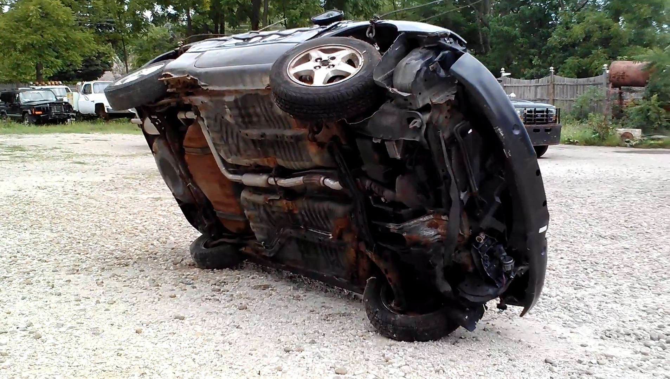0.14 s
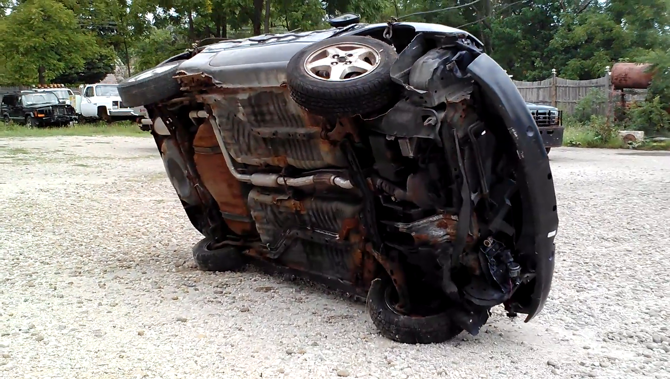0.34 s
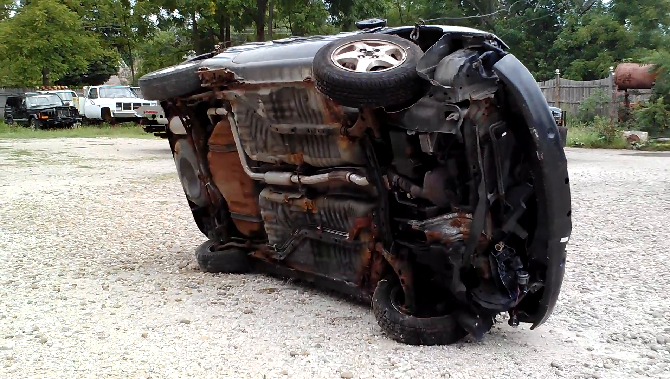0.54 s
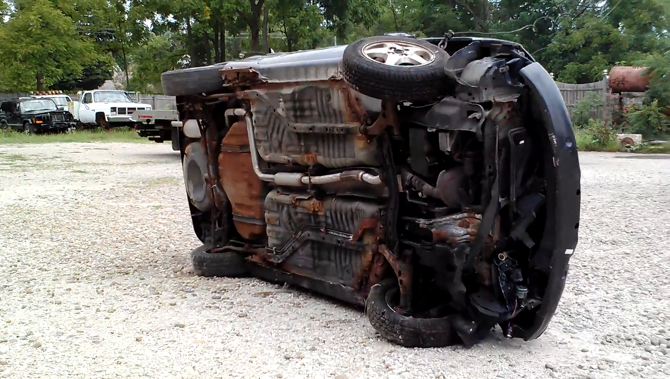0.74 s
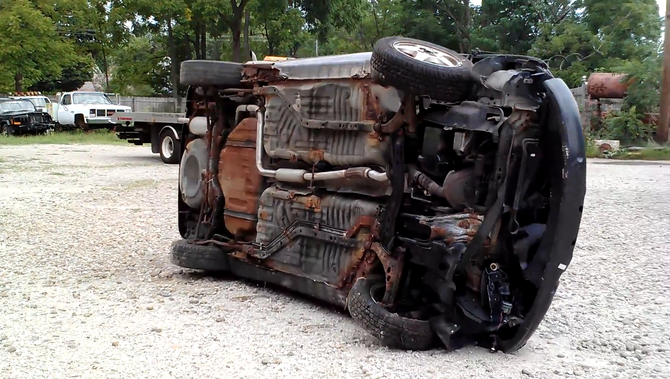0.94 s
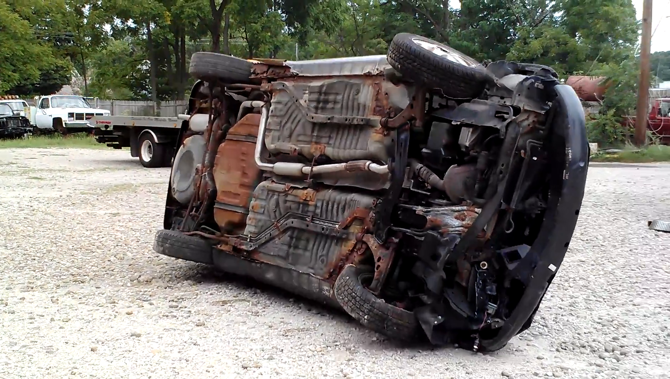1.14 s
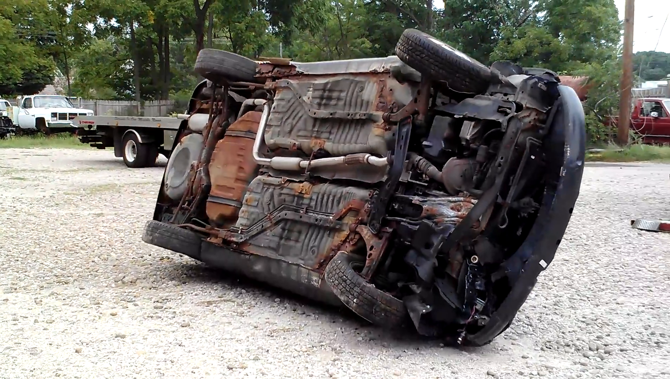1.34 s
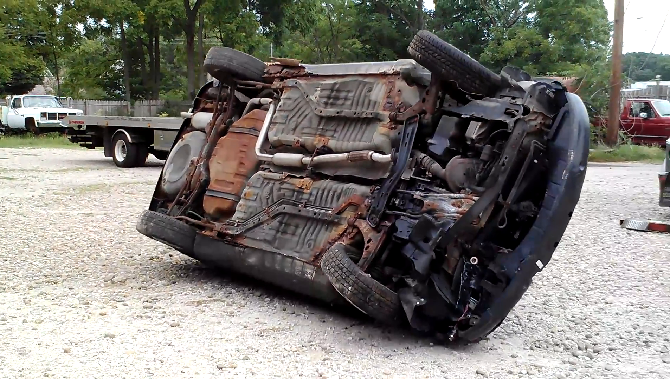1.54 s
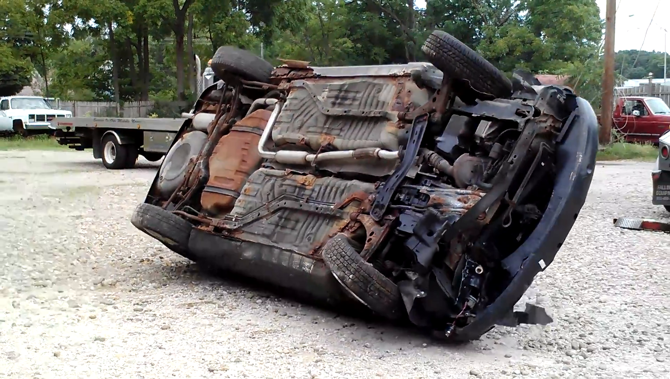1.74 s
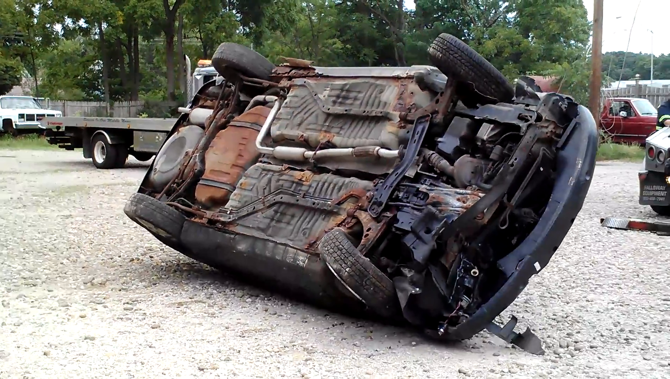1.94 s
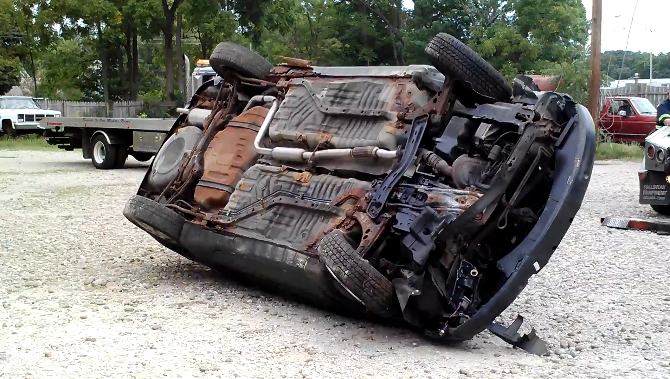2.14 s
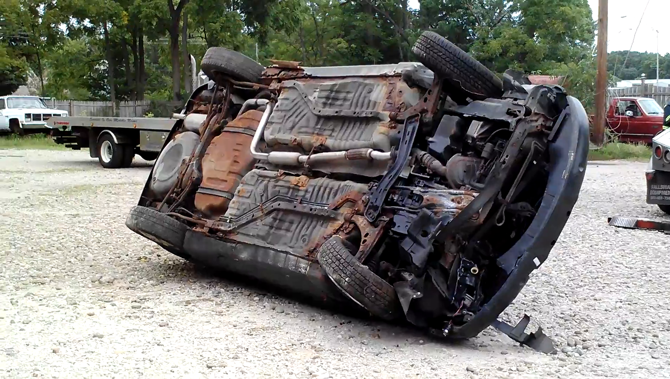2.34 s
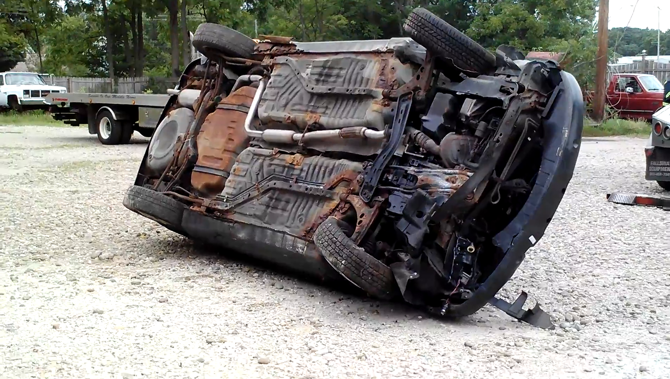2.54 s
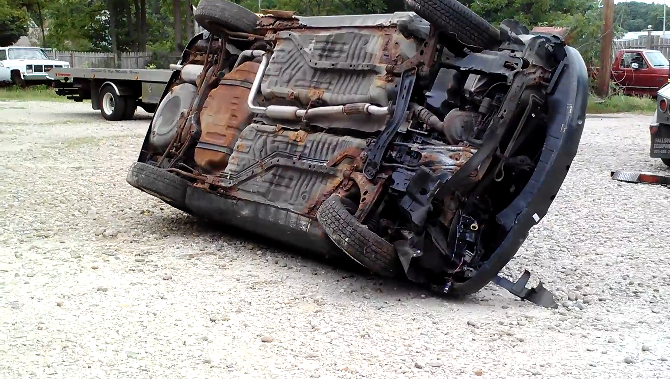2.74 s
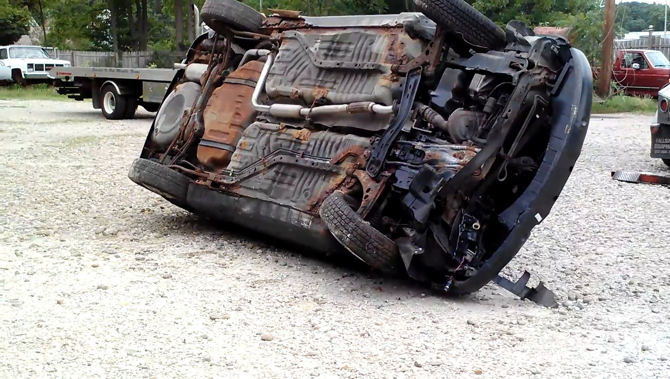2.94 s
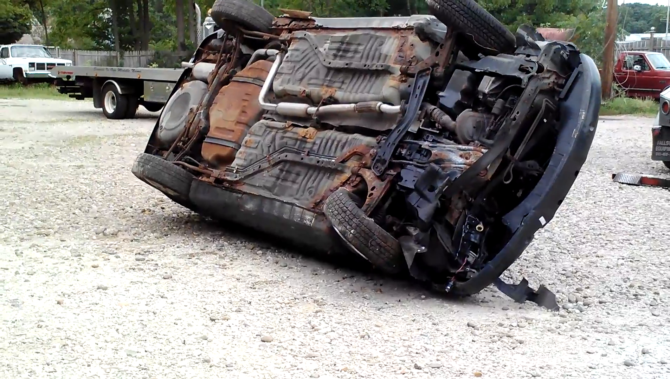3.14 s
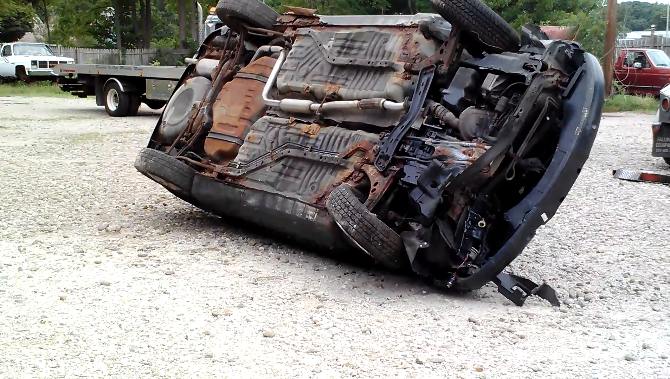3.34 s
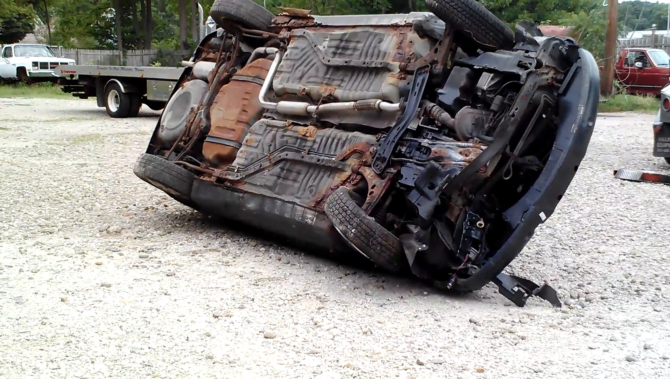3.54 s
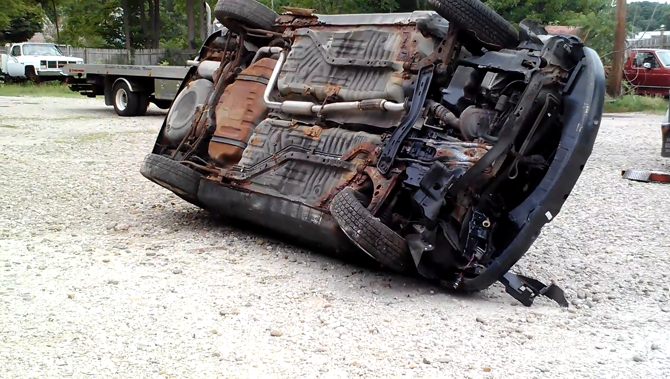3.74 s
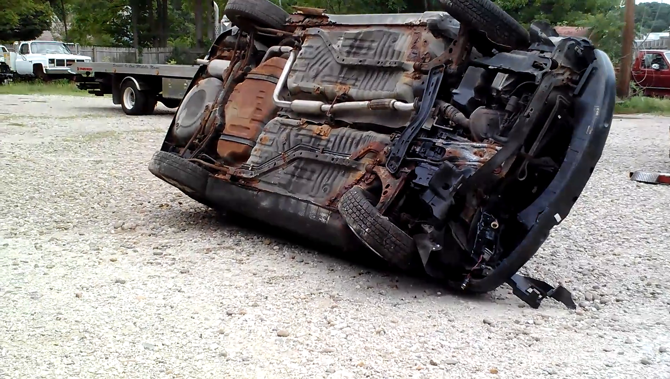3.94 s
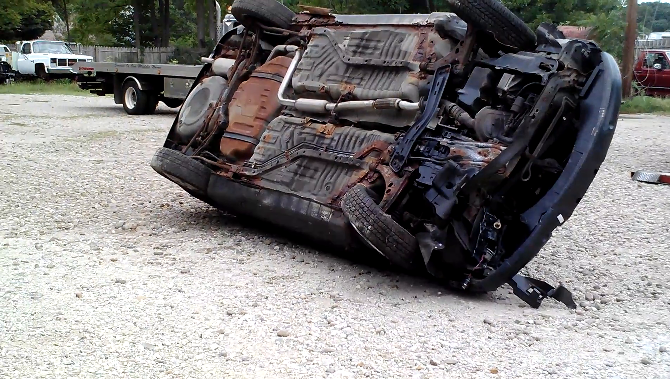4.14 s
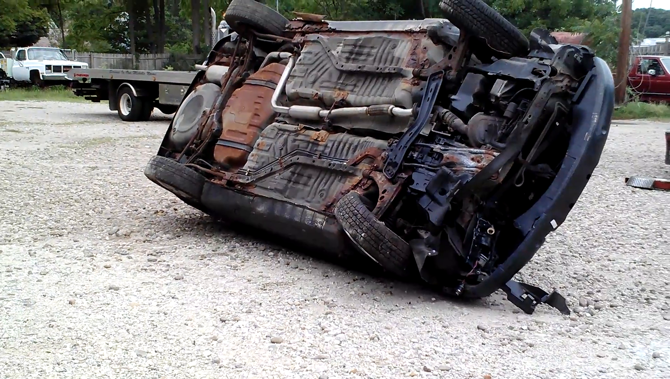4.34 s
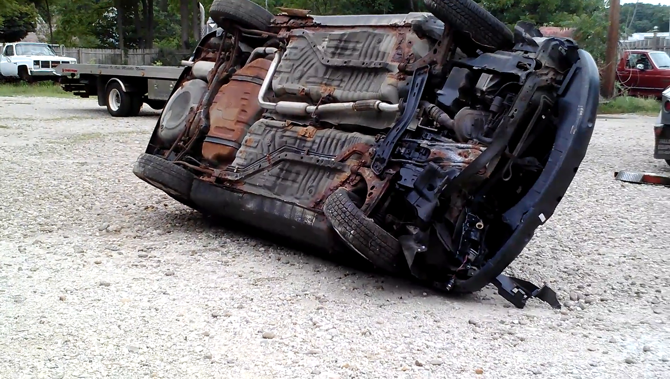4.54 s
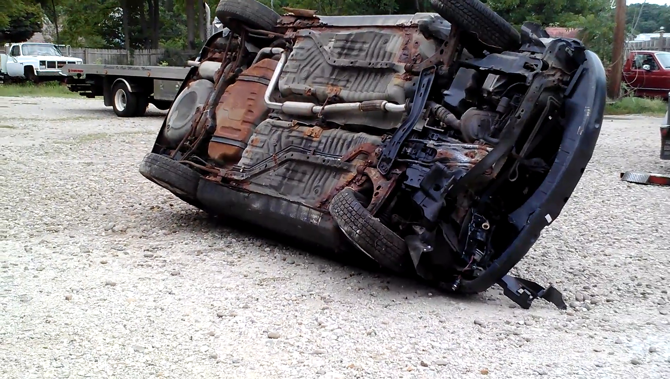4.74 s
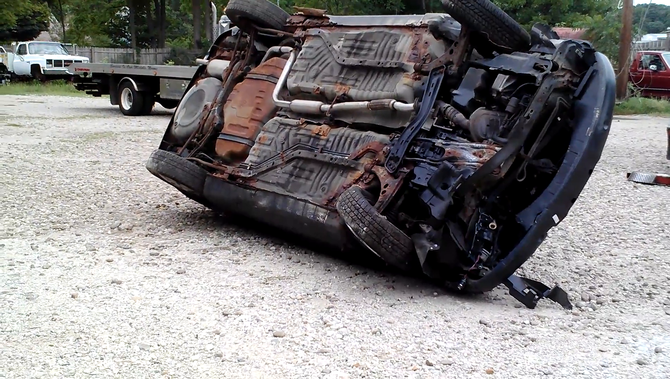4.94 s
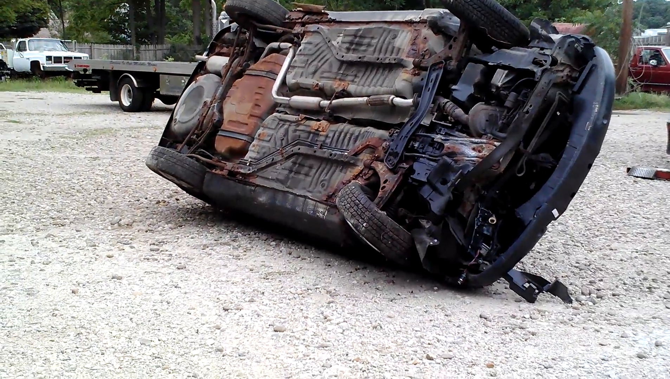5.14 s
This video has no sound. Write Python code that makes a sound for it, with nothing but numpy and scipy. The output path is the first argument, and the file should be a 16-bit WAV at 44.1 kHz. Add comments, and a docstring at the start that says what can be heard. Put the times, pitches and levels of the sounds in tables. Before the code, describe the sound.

Over a low idling engine, sheet metal snaps and buckles in a loud gravelly crash, followed by a steel clank and sparse settling knocks.

```python
"""Wrecked car rolled onto its roof

A wrecked car is pulled from its side over onto its roof in a gravel yard, with a tow truck running nearby.
The body snaps, buckles, thuds and grinds: random pushes and tiny slips shake ringing modes of the metal.
Slides groan or squeal as sagging tones, a loose steel part clanks, and the shell knocks as it settles.
Stones are showers of tiny random clicks; engine and hydraulics are filtered noise throbbing together over a hum."""
import sys
import numpy as np
from scipy import signal
from scipy.fft import rfft, irfft
from scipy.io import wavfile

SR = 44100
rng = np.random.default_rng(int(sys.argv[2]) if len(sys.argv) > 2 else 0)


def pcm_store(signal):
    """Save signal as 16-bit PCM."""
    levels = np.round(np.clip(np.atleast_2d(signal), -1, 1) * 32767)
    wavfile.write(sys.argv[1], SR, levels.astype(np.int16).T)


N = 228855
TIME = np.arange(N) / SR  # seconds from the start of the scene
AGE = TIME[:SR // 3]  # seconds from the start of one short event


def undb(db):
    """Turn decibels into a gain."""
    return 10 ** (np.asarray(db) / 20)


def unit(x):
    """Scale to an average (rms) level of 1."""
    return x / np.sqrt(np.mean(x ** 2) + 1e-18)


def unit_hit(x):
    """Scale a hit to rms 1 over its first 25 ms."""
    return x / np.sqrt(np.mean(x[:SR // 40] ** 2) + 1e-18)


def add(out, s, x):
    """Mix x into out from time s, cutting off whatever runs past the end."""
    i = max(int(s * SR), 0)
    out[i:i + len(x)] += x[:max(len(out) - i, 0)]


def through(x, response):
    """Let x excite an object with this response, keeping the length of x."""
    return signal.fftconvolve(x, response)[:len(x)]


def tone(points, size=4096):
    """Response of unit energy with a (Hz, dB) spectrum that acts as early as possible (minimum phase)."""
    hz, db = np.transpose(points)
    grid = np.maximum(np.arange(size // 2 + 1) * SR / size, 1)
    log_gain = np.log(undb(np.interp(np.log(grid), np.log(hz), db)))
    # folding the cepstrum forward in time leaves nothing before the hit
    cepstrum = irfft(log_gain)
    cepstrum[1:size // 2] *= 2
    cepstrum[size // 2 + 1:] = 0
    response = irfft(np.exp(rfft(cepstrum)))
    return response / np.linalg.norm(response)


# Three pitch ranges for boom, clang and crack. Each row: lowest and highest frequency in Hz.
REGISTER_EDGES = [(48, 450), (450, 1600), (1600, 12000)]


def registers(x):
    """Split a sound into boom, clang and crack with band filters."""
    parts = []
    for edges in REGISTER_EDGES:
        band = signal.butter(3, edges, "band", fs=SR, output="sos")
        parts.append(signal.sosfilt(band, x))
    return parts


def wander(rate, size):
    """Random motion: straight lines between random points, rate points a second, with a spread near 1."""
    knots = rng.standard_normal(4096)
    return np.interp(TIME[:size] * rate, np.arange(len(knots)), knots)


def slips(rate, spread_db, size):
    """Tiny slips at random moments, about rate a second, of uneven force and either direction."""
    when = rng.random(size) < rate / SR
    force = undb(spread_db * np.minimum(rng.exponential(size=size), 4))
    return unit(when * force * rng.choice([-1, 1], size))


def blow(slip_s, slip_db, rate=3000):
    """One sharp push, plus a dying shower of slips whose energy is set relative to the push."""
    push = slips(rate, 2.65, len(AGE)) * np.exp(-AGE / max(slip_s, .001))
    push *= undb(slip_db) / (np.linalg.norm(push) + 1e-9)
    push[0] += 1
    return push


def ring(modes, scatter_db, detune):
    """Fading tones of unit energy; each strike point weights and detunes them a little differently."""
    hz, db, t60 = np.transpose(modes)[:, :, None]
    weight, shift = rng.standard_normal((2, len(modes), 1))
    fade = undb(db + scatter_db * weight - 60 * AGE / t60)
    response = np.sum(fade * np.sin(2 * np.pi * hz * (1 + detune * shift) * AGE), axis=0)
    return response / np.linalg.norm(response)


def own_mode(hz, t60):
    """A single fading tone of unit energy, t60 being the seconds it takes to fall by 60 dB."""
    return ring([(hz, 0, t60)], scatter_db=0, detune=0)


# Notes at which the body shell rings.
# Each row: pitch in Hz, relative level in dB, time to fade by 60 dB in seconds; pitch and level then vary.
SHELL_MODES = [(88, -37.5, .12), (116, -4.5, 0.5), (161, -5.5, 0.25), (207, -12, 0.06), (247, -21, .1),
               (278, 2.5, 0.45), (311.5, 2.5, 0.34), (333, -4.5, 0.17), (402.7, 4, 0.15), (487, -0.5, 0.33),
               (608.5, 1.5, 0.15), (686.4, 2, 0.21), (764, -4.5, 0.5), (850, 5, 0.096), (1077, 0, 0.14),
               (1165, -2.5, 0.18), (1270, -4, 0.32), (2084, -3, 0.13), (2420, 2, 0.16),
               (2780, -20.5, 0.039), (4200, -7, 0.024), (4360, -29, .06), (4700, -28, 0.074)]
# Colour of the dull crash made by the shell's many short notes. Each row: frequency in Hz, relative level in dB.
SHEET_COLOUR = [(45, -17), (100, -0.5), (290, 5.5), (550, 0.5), (760, 2), (1000, -8), (1300, -8),
                (1650, -23.5), (2450, -7), (3600, -23), (4600, -13), (6400, -25), (8000, -42),
                (10000, -54.5)]


def shell(sheet, ring_db, spread_db=2, spread_s=0.0035):
    """Response of the car body at one point: a dull crash and the ring of its panels."""
    # bending waves bounce between the seams and spread each click over a few milliseconds
    bounces = rng.standard_normal(len(AGE)) * np.exp(-AGE / spread_s)
    bounces *= undb(spread_db) / np.linalg.norm(bounces)
    bounces[0] += 1
    crash = through(bounces, sheet)
    crash = crash / np.linalg.norm(crash)
    return crash + undb(ring_db) * ring(SHELL_MODES, scatter_db=8, detune=0.03)


HUM_HZ, HUM_DB = 46.5, -46  # both waver a little


def hum():
    """A deep idle hum lies under the yard: one sine whose pitch and level waver slightly."""
    phase = 2 * np.pi * np.cumsum(HUM_HZ * (1 + 0.0047 * wander(7.5, N))) / SR
    return undb(HUM_DB + 1.9 * wander(23.0, N)) * np.sqrt(2) * np.sin(phase)


# Steady engine tones. Each row: multiple of the firing rate, average level in dB relative to the rumble.
ENGINE_ORDERS = [(2, -11.5), (3, -13), (7, -25)]
# Colours of the engine rumble, the pump hiss and the valve hiss.
# Each row: frequency in Hz, relative level in dB.
RUMBLE_COLOUR = [(35, -47), (55, -13.5), (75, -3), (100, 4), (170, 1.5), (320, 2.5), (500, -4),
                 (1100, -9.5), (1600, -18), (2200, -16.5), (3400, -24), (6000, -21.5), (7400, -27),
                 (9000, -56)]
PUMP_COLOUR = [(1500, -21), (2200, -22.5), (2560, -9), (2850, -20.5), (3400, -32), (9000, -41.5)]
VALVE_COLOUR = [(3000, -46.5), (3700, -11), (3920, 4), (4250, 4), (5000, -16.5), (6000, -8), (9000, -26)]
# the engine labours when the valve opens, then picks up again
IDLE_HZ, LABOUR_DROP_HZ = 44.8, 6  # firing rate and how far it sinks
VALVE_OPENS_S, VALVE_RISE_S, RECOVER_S = 3.36, 0.084, 1.6
RUMBLE_DB, PUMP_DB, VALVE_DB = -32.5, -44.5, -48  # base levels
VALVE_OPEN_DB = 4.5  # extra valve hiss at full opening
HISS_GROWS_DB, HISS_GROWS_S = 0.5, 3.2  # the hiss starts this many dB softer and grows to full level over these seconds
PULL_RUMBLE_DB, PULL_RISE_S = 0.8, 0.5  # the engine runs a little louder while it hauls the car over
LABOUR_DB = -0.5  # and softer while it is slowed


def truck(throb=0.048, ripple=0.29, rumble_drift_db=0.38, hiss_drift_db=1.67):
    """The engine rumbles once per firing; the hydraulic pump and valve hiss in the same rhythm."""
    effort = np.interp(TIME - VALVE_OPENS_S, [0, VALVE_RISE_S, VALVE_RISE_S + RECOVER_S], [0, 1, 0])
    hz = IDLE_HZ - LABOUR_DROP_HZ * effort ** 2
    phase = 2 * np.pi * np.cumsum(hz * (1 + 0.014 * wander(20, N))) / SR

    bursts = rng.standard_normal(N) * (1 + throb * np.cos(phase))
    rumble = unit(through(bursts, tone(RUMBLE_COLOUR)))
    orders = 0
    for multiple, db in ENGINE_ORDERS:
        orders = orders + undb(db + 2 * wander(8.7, N)) * np.sqrt(2) * np.sin(round(multiple) * phase)
    # the extra loudness stops at once when the valve is fully open
    hauling_db = np.interp(TIME, [0, PULL_RISE_S], [0, PULL_RUMBLE_DB])
    hauling_db = np.where(TIME > VALVE_OPENS_S + VALVE_RISE_S, 0, hauling_db)
    engine_db = RUMBLE_DB + hauling_db + LABOUR_DB * effort + rumble_drift_db * wander(5.17, N)
    out = undb(engine_db) * (rumble + orders)

    working_db = np.interp(TIME, [0, HISS_GROWS_S], [-HISS_GROWS_DB, 0])
    valve_db = VALVE_DB + VALVE_OPEN_DB * np.sqrt(effort)
    for colour, db in (PUMP_COLOUR, PUMP_DB), (VALVE_COLOUR, valve_db):
        flow = rng.standard_normal(N) * (1 + ripple * np.cos(phase))
        hiss = unit(through(flow, tone(colour)))
        out += undb(db + working_db + hiss_drift_db * wander(30, N)) * hiss
    return out


# Colour of moving stones, for the trickle and the crushed stones.
# Each row: frequency in Hz, relative level in dB.
STONE_COLOUR = [(200, 4.5), (1000, 2), (1600, -9.5), (2500, -1), (3600, -9), (4600, 0), (6500, -9),
                (8000, -29), (10000, -31.5)]
# gravel keeps shifting under the roof, slightly less often as time goes on; pockets past the end go unheard
TRICKLE_FROM_S, TRICKLE_UNTIL_S = 1.8, 7.5
TRICKLE_DB, TRICKLE_FADE_S = -38, 0.0068  # average level before fading, fade time of one pocket


def trickle(scatter_db=2, count=14):
    """Small pockets of stones give way at random, each a quickly dying shower of clicks."""
    out, colour = np.zeros(N), tone(STONE_COLOUR)
    for _ in range(count):
        s = TRICKLE_FROM_S + (TRICKLE_UNTIL_S - TRICKLE_FROM_S) * rng.random() ** 1.2
        grains = slips(rate=2400, spread_db=3.0, size=len(AGE)) * np.exp(-AGE / TRICKLE_FADE_S)
        level = undb(TRICKLE_DB + scatter_db * rng.standard_normal())
        add(out, s, level * through(grains, colour))
    return out


# Stones crushed and pushed aside. Each row: start in seconds, length in seconds, level in dB before the swell.
STONE_SHOWERS = [(0.753, 0.059, -27.5), (0.931, 0.042, -24), (0.993, 0.038, -26), (1.117, 0.068, -24),
                 (1.273, 0.056, -28), (1.319, 0.053, -19.5), (1.507, 0.064, -23), (1.578, 0.025, -16),
                 (1.663, 0.061, -25), (1.729, 0.031, -14), (1.747, 0.038, -10.5), (1.79, 0.0094, -12.5),
                 (1.807, 0.017, -15.5), (1.933, 0.024, -23), (2.225, 0.028, -23), (2.293, 0.032, -23),
                 (2.444, 0.056, -31), (2.528, 0.016, -30), (3.059, 0.031, -21), (3.075, 0.049, -26),
                 (3.297, 0.042, -37.5), (3.544, 0.022, -32), (3.634, 0.025, -35.5)]


def stones(clump_db=1):
    """Short showers of gravel grains that swell fast and thin out in clumps."""
    out, colour = np.zeros(N), tone(STONE_COLOUR)
    for s, length, db in STONE_SHOWERS:
        swell = np.sin(np.pi * np.minimum(AGE / length, 1) ** 0.61)
        clumps = undb(clump_db * wander(247, len(AGE)))
        grains = slips(rate=6000, spread_db=-1.1, size=len(AGE))
        add(out, s, undb(db) * through(swell * clumps * grains, colour))
    return out


# Knocks of the wreck settling on its roof. Each row: start in seconds, level in dB,
# tilt towards the treble in dB per octave, time the gravel takes to yield in seconds.
SETTLING_KNOCKS = [(2.881, -27.5, -0.8, 0.0066), (2.929, -25, 2, 0.0015), (3.119, -22, -5.5, 0.0062),
                   (3.4808, -18.5, 1.5, 0.0011), (3.592, -31.5, -3.5, 0.0029), (4.4513, -19, -1.34, 0.0022),
                   (4.706, -31.5, 1, 0.0048), (4.753, -37, 0.5, 0.004)]
# Colour of a knock before the tilt. Each row: frequency in Hz, relative level in dB.
KNOCK_COLOUR = [(80, -20), (230, 2.5), (300, 5), (420, -8), (530, -13), (660, -2), (850, -3.5),
                (980, -10.5), (1170, -4), (1400, -10.5), (1800, -18), (2400, -13), (3000, -16.5),
                (3650, -27), (4250, -13), (5200, -21), (6700, -26), (9000, -49)]


def knocks(rebound_s=0.0105, rebound_db=-5, scatter_s=0.029, scatter_db=2, ring_db=-12):
    """The resting shell drops a little onto gravel: a dry knock, one rebound and a scatter of small contacts."""
    out = np.zeros(N)
    for s, db, tilt, yield_s in SETTLING_KNOCKS:
        tilted = [(hz, level + tilt * np.log2(hz)) for hz, level in KNOCK_COLOUR]
        colour = tone(tilted, size=len(AGE))
        push = blow(slip_s=0.0057, slip_db=10, rate=9000) + blow(scatter_s, scatter_db, rate=6500)
        add(push, rebound_s, undb(rebound_db) * blow(slip_s=0.0069, slip_db=8, rate=9000))
        push *= np.minimum(AGE / yield_s, 1)  # soft gravel rounds the start
        body = colour + undb(ring_db) * ring(SHELL_MODES, scatter_db=5.0, detune=0.033)
        add(out, s, undb(db) * unit_hit(through(push, body)))
    return out


# Metal sliding on metal, from low groans to squeals. Each row: start in seconds, length in seconds,
# starting pitch in Hz, average level in dB, share of the pitch lost as the slide slows.
SLIDES = [(0.264, 0.11, 2780, -39, 0.026), (0.802, 0.0456, 315, -10, 0.14),
          (0.819, 0.028, 2246, -22.5, 0.097), (0.828, 0.039, 3470, -26, 0.03),
          (0.837, 0.025, 2995, -16, 0.085), (0.836, 0.041, 4800, -30, 0.03),
          (0.851, 0.035, 2740, -21.5, 0.041), (1.251, 0.033, 501, -13.5, 0.046),
          (1.399, 0.027, 418, -12, 0.07), (1.411, 0.046, 259, -13.5, 0.052),
          (1.491, 0.018, 290, -11, 0.045), (2.174, 0.055, 3360, -42, 0.04),
          (2.253, 0.038, 2680, -33.5, 0.07), (2.38, 0.022, 2340, -40, 0.04),
          (2.406, 0.028, 2190, -39, 0.04)]


def squeals(flutter_db=4, light_rough=0.014, heavy_rough=0.128):
    """Sliding edges groan or sing briefly on a sagging note; louder slides have a rougher pitch, like a scrape."""
    out = np.zeros(N)
    for s, length, first_hz, db, sag in SLIDES:
        travel = np.minimum(AGE / length, 1)
        rough = np.interp(db, [-35, -22], [light_rough, heavy_rough])
        hz = first_hz * (1 - sag * travel) * (1 + rough * wander(913, len(AGE)))
        swell = np.sqrt(2 * np.abs(np.sin(np.pi * travel)))
        grip = swell * undb(db + flutter_db * wander(489, len(AGE)))
        add(out, s, grip * np.sin(2 * np.pi * np.cumsum(hz) / SR))
    return out


# Notes of the loose steel part.
# Each row: pitch in Hz, relative level in dB, time to fade by 60 dB in seconds; pitch and level vary slightly.
CLANK_MODES = [(634, -6, 0.25), (730, 0, .12), (757, 1.5, 0.11), (834, 5.5, 0.098), (1115, -6.5, 0.15),
               (1272, -6, 0.17), (2190, -26, 0.08), (2337, -8, 0.058), (2540, -23, .08), (2730, -20, 0.12),
               (3900, -26, 0.1), (4270, -40, .1)]
# Colour of its rattle. Each row: frequency in Hz, relative level in dB.
RATTLE_COLOUR = [(150, -23), (500, -4.5), (780, 2), (1250, -5.5), (1650, -14.5), (2400, -8.5), (3500, -21),
                 (4600, -16.5), (6500, -32), (9000, -57)]
CLANK_S, CLANK_DB = 2.3378, -7.5  # start, level


def clank(bounce_db=-9, rattle_db=-4.5, bounce_s=0.015, rattle_s=0.062, stop_s=0.055, contact_s=0.0013):
    """A loose steel part strikes hard, then bounces and rattles against the shell until it lies still."""
    out, part = np.zeros(N), ring(CLANK_MODES, scatter_db=-1.0, detune=0.0014)
    bounces = through(blow(bounce_s, slip_db=20, rate=240), part)
    taps = blow(rattle_s, slip_db=22, rate=2200) * np.exp(-(AGE / stop_s) ** 4)
    rattle = through(taps, tone(RATTLE_COLOUR))
    hit = unit_hit(part) + undb(bounce_db) * unit_hit(bounces) + undb(rattle_db) * unit_hit(rattle)
    # the yielding panel rounds the first contact
    add(out, CLANK_S, undb(CLANK_DB) * unit_hit(hit * np.minimum(AGE / contact_s, 1)))
    return out


# Wide panels taking the weight. Each row: start in seconds, pitch in Hz before the sag, level in dB,
# level of the heave of the whole shell in dB, time to swell in seconds.
PANEL_THUDS = [(0.198, 200, -23, -19.5, 0.0049), (0.258, 172, -30, -35, .006), (0.659, 269, -26, -21, .006),
               (0.793, 300, -13, -30, .005), (0.866, 254, -9.5, -13.5, .005), (0.889, 258, -13, -32, .006),
               (0.992, 290, -24, -15.5, .005), (1.034, 380, -17.5, -22.5, .005),
               (1.054, 254, -14, -26, .005), (1.089, 350, -16.5, -32, .005), (1.14, 302, -15, -16.5, .007),
               (1.199, 285, -14.5, -21, .006), (1.273, 320, -15, -32, .005), (1.293, 339, -14, -22, .005),
               (1.32, 302, -15, -23, .006), (1.369, 285, -11.5, -32, .006), (1.385, 330, -20, -15, .005),
               (1.452, 370, -18, -13.5, .006), (1.571, 290, -18, -31, .005), (1.608, 300, -26, -27, .005),
               (1.661, 240, -20, -23, .004), (1.699, 302, -20, -21, .005), (1.744, 260, -24, -20, .005),
               (1.908, 302, -25, -27, .005), (1.947, 360, -20, -41, .006), (2.2, 230, -24.5, -38, .005),
               (2.273, 269, -22, -31, .006)]
HEAVE_HZ = 142  # the whole shell's note, before scatter and sag
THUD_SAG = .06  # pitch slides from this share above the note to the same share below


def thuds(release=.8, rough=.04, heave_scatter=.05):
    """A wide panel gives way with one short, sagging note, and the whole shell heaves under it."""
    out = np.zeros(N)
    for s, hz, db, heave_db, swell_s in PANEL_THUDS:
        age = AGE / swell_s
        swell = (age * np.exp(1 - age)) ** release
        sag = THUD_SAG * (2 * np.exp(-age / 2) - 1)
        turn = 2 * np.pi * np.cumsum(1 + sag + rough * wander(400, len(AGE))) / SR
        heave_hz = HEAVE_HZ * (1 + heave_scatter * rng.standard_normal())
        panel = undb(db) * np.sin(hz * turn)
        heave = undb(heave_db) * np.sin(heave_hz * turn)
        add(out, s, np.sqrt(2) * swell * (panel + heave))
    return out


# The weight bears on the roof and pushes it along the ground. Each row: start in seconds, end in seconds,
# load in dB, extra level of the grit under the roof in dB, release in dB per second.
ROOF_SHOVES = [(0.139, 0.205, -16, 2, 93), (0.41, 0.723, -17, -3, 68), (0.739, 0.867, 5.5, -1.5, 71),
               (0.95, 1.167, 2.5, -3.5, 31), (1.261, 1.382, 5, -2.5, 74), (1.434, 1.54, 2, 1.5, 41),
               (1.637, 1.813, 1, 4.5, 56), (2.206, 2.35, -5, 0.5, 89)]
LOAD_RISE_S = 0.0092


def roof_load():
    """Each shove builds quickly, holds, and dies away; returns the load and the part of it that crushes grit."""
    loads, grits = [], []
    for start, end, db, grit_db, release in ROOF_SHOVES:
        build = np.clip((TIME - start) / LOAD_RISE_S, 0, 1)
        load = build * undb(db - release * np.maximum(TIME - end, 0))
        loads.append(load)
        grits.append(load * undb(grit_db))
    return np.max(loads, axis=0), np.max(grits, axis=0)


# Colour of gravel grinding under the roof. Each row: frequency in Hz, relative level in dB.
GRIT_COLOUR = [(700, -23), (1400, -5.5), (1900, 4), (2500, -2), (3100, 3), (3700, -6), (4500, -2),
               (6400, -8.5), (8000, -35), (10000, -37)]
JERKS_PER_S, JERK_SPREAD_DB = 110, 2.5  # the roof sticks and slips along the ground


def grinding(boom_db=-22, clang_db=-21.5, crackle_db=-34, gravel_db=-35, jerk_db=1.0, shift_db=3,
             gravel_jerk_db=4, count=6):
    """Contact points stick and slip in jerks, each shaking the shell in its own way; the gravel under them roars."""
    sheet, crunch, total = tone(SHEET_COLOUR), 0, 0
    for _ in range(count):
        load = undb(shift_db * wander(8.65, N))
        jerks = slips(JERKS_PER_S, JERK_SPREAD_DB, size=N) * undb(jerk_db * wander(70, N))
        crunch = crunch + through(load * jerks, shell(sheet, ring_db=-4))
        total = total + load ** 2
    # together the contact points always carry the same weight
    boom, clang, crackle = map(unit, registers(crunch / np.sqrt(total)))
    grains = slips(rate=2500, spread_db=1.5, size=N) * undb(gravel_jerk_db * wander(90, N))
    gravel = unit(through(grains, tone(GRIT_COLOUR)))
    weight, grit = roof_load()
    metal = weight * (undb(boom_db) * boom + undb(clang_db) * clang)
    return metal + grit * (undb(crackle_db) * crackle + undb(gravel_db) * gravel)


# Sheet metal buckling. Each row: start in seconds, strength in dB before the boom, clang and crack settings,
# pitch of the dent in Hz, extra strength of the crack in dB, time the fold keeps slipping in seconds.
PANEL_BUCKLES = [(0.155, -30, 633, -19, 0.034), (0.333, -25, 826, -13, 0.012),
                 (0.719, -14, 780, -38, 0.0085), (0.733, -7.5, 762, -13.5, 0.0083),
                 (0.749, -13.5, 770, -26, .016), (0.794, -7.5, 734, -15, .014),
                 (0.817, -10.5, 647, -12.5, 0.025), (0.846, -17, 800, -10, 0.0058),
                 (0.896, -16.5, 1040, -11, 0.0074), (0.913, -12.5, 815, -19, 0.0087),
                 (0.973, -18, 688, -5, 0.0073), (1.032, -6, 740, -16.5, 0.012),
                 (1.089, -24, 424, -19, 0.0055), (1.139, -14, 423, -3, 0.02),
                 (1.1945, -9.5, 720, -19, 0.0029), (1.297, -19, 595, -11, 0.02),
                 (1.321, -13, 790, -8, 0.016), (1.385, -6, 640, -16, 0.0088),
                 (1.448, -18.5, 730, -8, 0.0062), (1.505, -12, 425, -14.5, 0.0057),
                 (1.511, -12, 756, -4, 0.023), (1.608, -8.5, 510, -19, 0.0056),
                 (1.611, -12.5, 760, -10, 0.013), (1.634, -11.5, 940, -6.5, 0.0024),
                 (1.665, -13, 693, -3.5, 0.026), (1.701, -12, 525, -7, 0.0057),
                 (1.744, -13, 700, 1, 0.0072), (1.7481, -16, 1340, 1, 0.01), (1.778, -16, 820, -0.5, .006),
                 (1.793, -13, 870, -4, .007), (1.812, -8.5, 757, -14, 0.0054),
                 (1.824, -11.5, 615, -19, 0.0082), (1.855, -15, 734, -14, 0.0059),
                 (1.91, -14.5, 397, -16, 0.029), (2.067, -21.5, 970, -9.5, .007),
                 (2.223, -17.5, 650, -7, .016), (2.258, -19, 394, -24, 0.013),
                 (2.276, -24, 630, -16, 0.017)]
DENT_OVERTONE = 1.735  # a dent's second note, as a multiple of its pitch


def buckles(boom_db=-13.5, clang_db=-5, crack_db=-4.0, dent_db=-1.5, dent_t60=0.06,
            overtone_db=-7, overtone_t60=.04, ring_db=-7, yield_s=0.00052):
    """Panels snap through; each dent rings at its own pitch while the fold slips on for a moment."""
    out, sheet = np.zeros(N), tone(SHEET_COLOUR)
    for s, db, dent_hz, extra_crack_db, slip_s in PANEL_BUCKLES:
        push = blow(slip_s, slip_db=4, rate=1600)
        overtone = own_mode(dent_hz * DENT_OVERTONE, overtone_t60)
        dent = own_mode(dent_hz, dent_t60) + undb(overtone_db) * overtone
        body = shell(sheet, ring_db) + undb(dent_db) * dent
        hit = through(push, body) * np.minimum(AGE / yield_s, 1)
        boom, clang, crack = map(unit_hit, registers(hit))
        mix = undb(boom_db) * boom + undb(clang_db) * clang + undb(extra_crack_db + crack_db) * crack
        add(out, s, undb(db) * mix)
    return out


# Dry snaps of the body taking the load. Each row: start in seconds, strength in dB before the overall snap level.
BODY_SNAPS = [(0.145, -26.5), (0.2067, -28), (0.241, -23), (0.3334, -21), (0.383, -19), (0.417, -10.5),
              (0.436, -16), (0.4558, -10), (0.49, -16.5), (0.513, -18.5), (0.5321, -6.5), (0.5451, -12),
              (0.5544, -22), (0.5764, -17), (0.605, -16.5), (0.6312, -9.5), (0.6584, -7.5), (0.6717, -11),
              (0.6923, -16), (0.7333, -6.5)]
# Colour of a snap. Each row: frequency in Hz, relative level in dB.
SNAP_COLOUR = [(80, -4), (220, -5), (600, 2), (850, 1), (1350, -5), (1650, -22), (2150, 0.5), (2500, -12),
               (2900, 5), (3300, 5.5), (3700, -6), (4300, 1), (6400, -8), (8000, -25), (10000, -44.5)]
SEAM_HZ, PING_T60_S = 2937, .022  # all snaps come from one seam and ping near its pitch; time to fade by 60 dB


def snaps(snap_db=-11, ping_db=-2, ping_growth=0.87, thud_db=-8.0, ping_scatter=0.044, contact_s=0.0014,
          crackle_s=0.024, crackle_db=-7):
    """A strained seam cracks brightly; each crack jolts the shell and crackles on, and hard ones ping more."""
    out, colour, sheet = np.zeros(N), tone(SNAP_COLOUR), tone(SHEET_COLOUR)
    hardest_db = max(db for _, db in BODY_SNAPS)
    for s, db in BODY_SNAPS:
        push = blow(slip_s=0.0097, slip_db=3.5) + blow(crackle_s, crackle_db, rate=1100)
        ping = own_mode(SEAM_HZ * (1 + ping_scatter * rng.standard_normal()), PING_T60_S)
        ping_level = undb(ping_db + ping_growth * (db - hardest_db))
        body = ping_level * ping + undb(thud_db) * shell(sheet, ring_db=3.0)
        crack = through(push, colour) + through(push, body)
        add(out, s, undb(db + snap_db) * unit_hit(crack * np.minimum(AGE / contact_s, 1)))
    return out


def scene():
    """The car going over, with the truck nearby, as one channel."""
    background = hum() + truck()
    ground = trickle() + stones() + knocks()
    metal = squeals() + clank() + thuds() + grinding() + buckles() + snaps()
    return (background + ground + metal)[None]


def record(dry, low_hz=38, dull_hz=9300, top_hz=16100):
    """A small camera: no deep bass, a dull top, and the loudest peaks overload."""
    x = signal.sosfilt(signal.butter(6, low_hz, "high", fs=SR, output="sos"), dry)
    x = signal.sosfilt(signal.ellip(8, .3, 70, dull_hz, fs=SR, output="sos"), x)
    x = x / (1 + x ** 8) ** (1 / 8)  # bends peaks smoothly so that they stay within 1
    return signal.sosfilt(signal.ellip(8, .2, 70, top_hz, fs=SR, output="sos"), x)


dry = scene()
out = record(dry)
pcm_store(out)
```